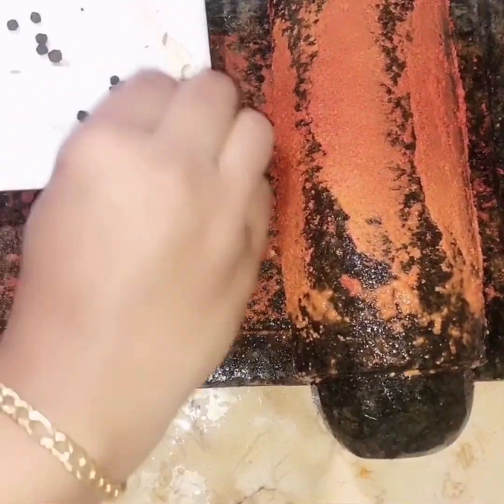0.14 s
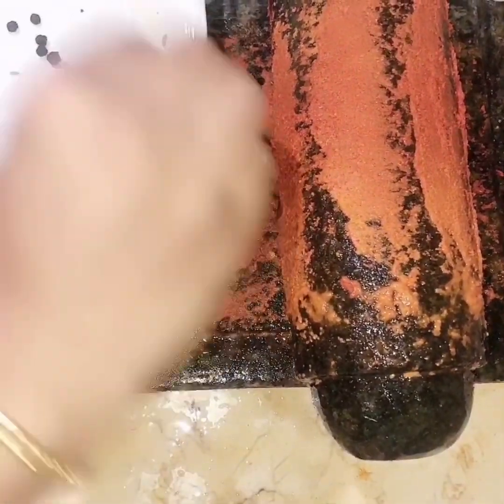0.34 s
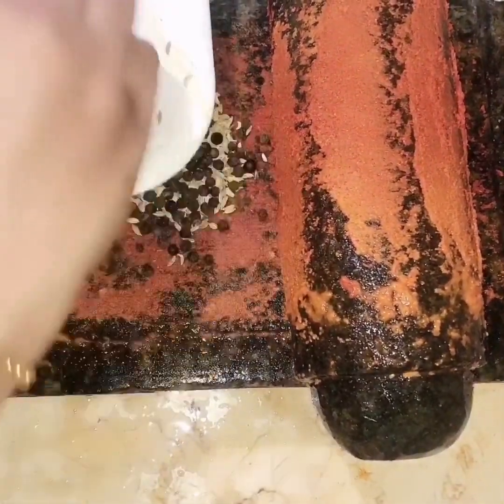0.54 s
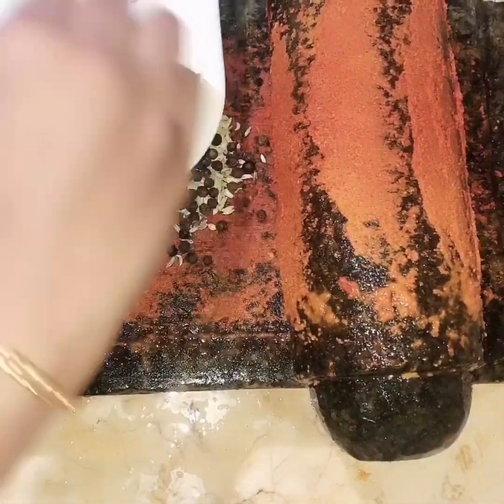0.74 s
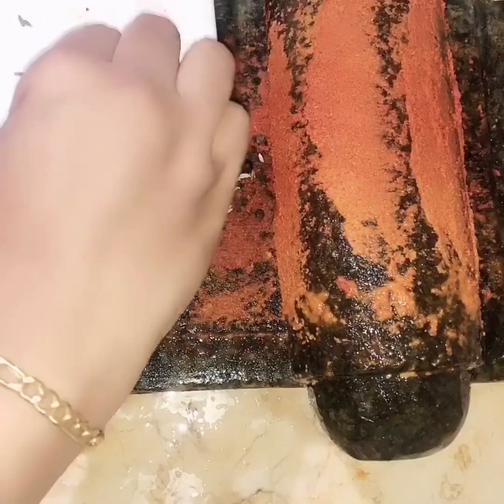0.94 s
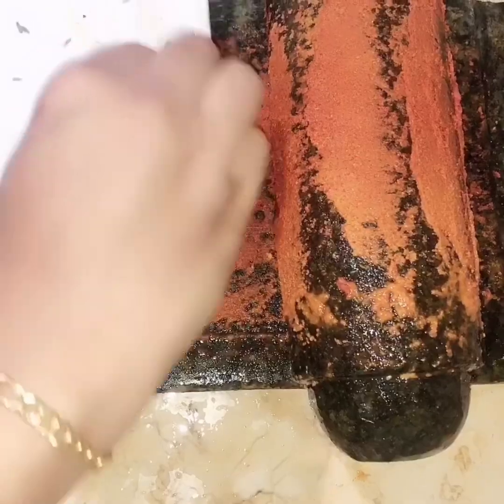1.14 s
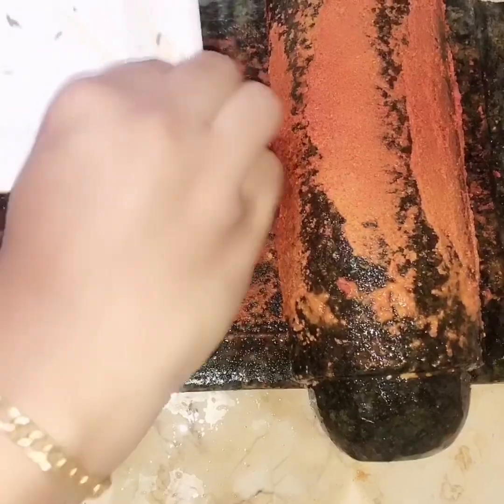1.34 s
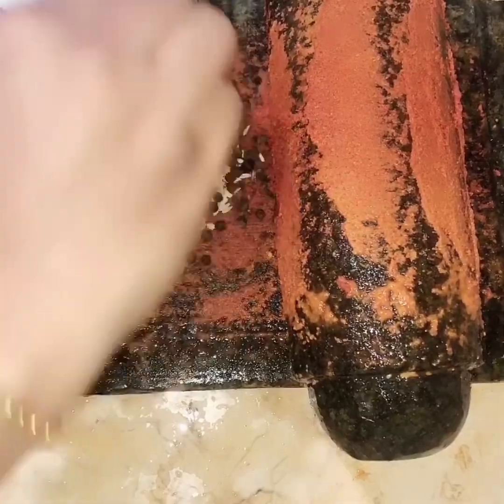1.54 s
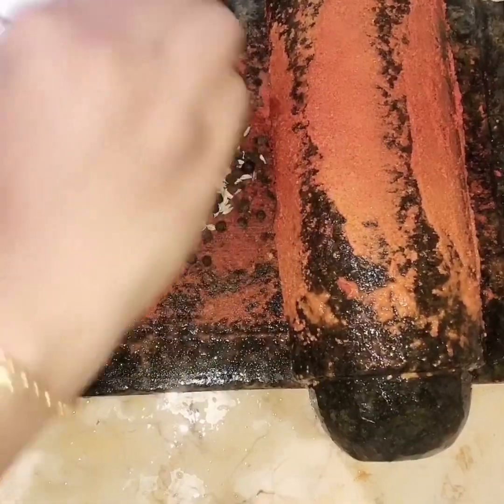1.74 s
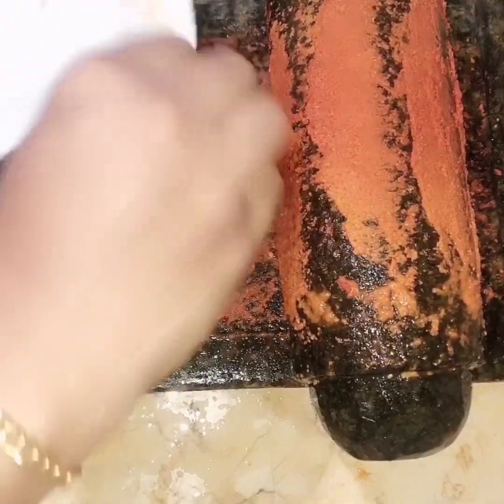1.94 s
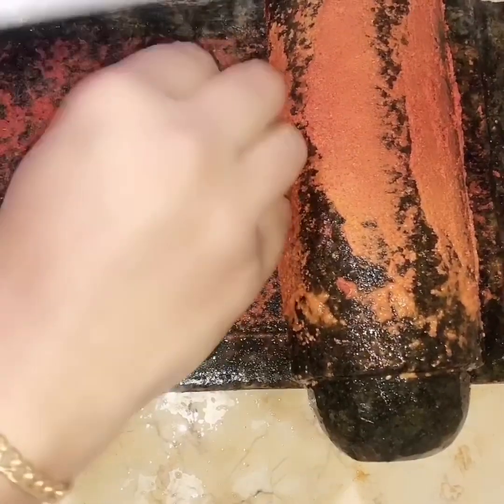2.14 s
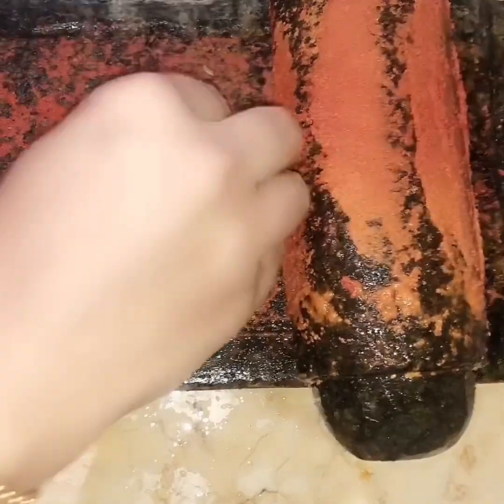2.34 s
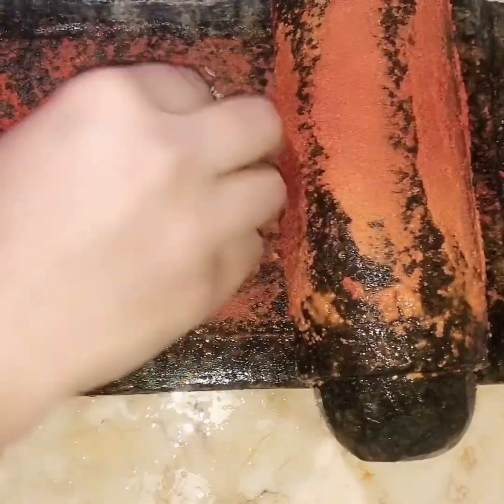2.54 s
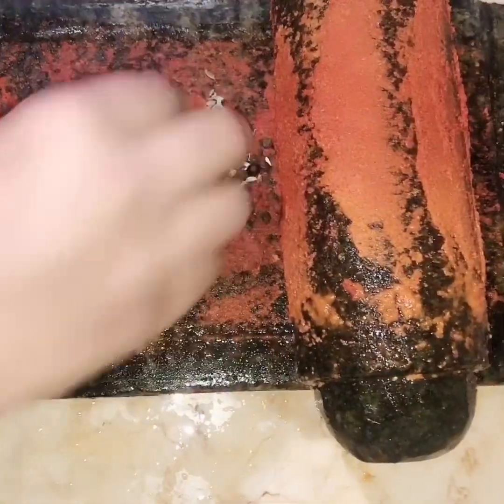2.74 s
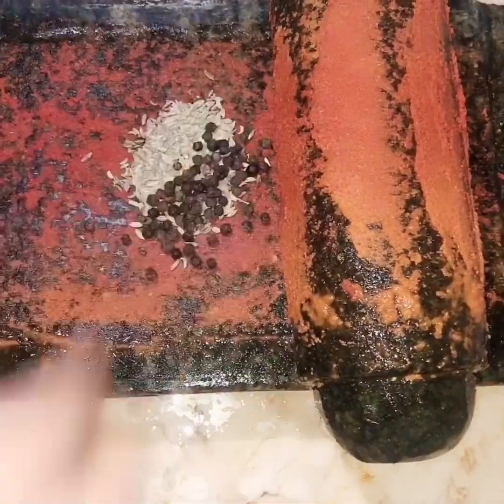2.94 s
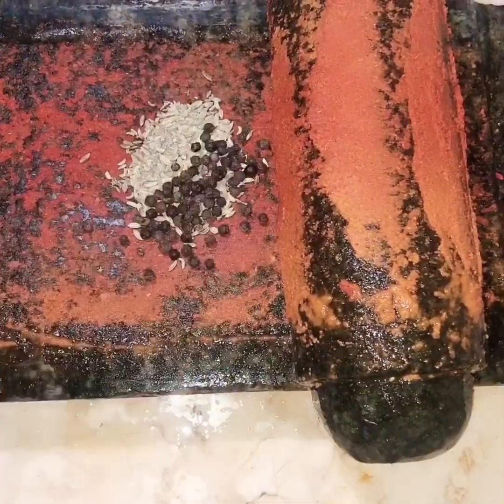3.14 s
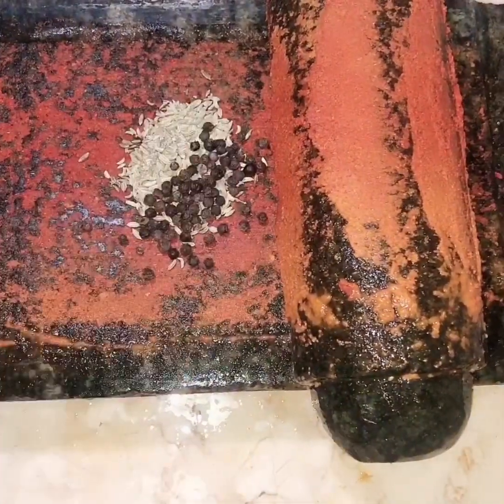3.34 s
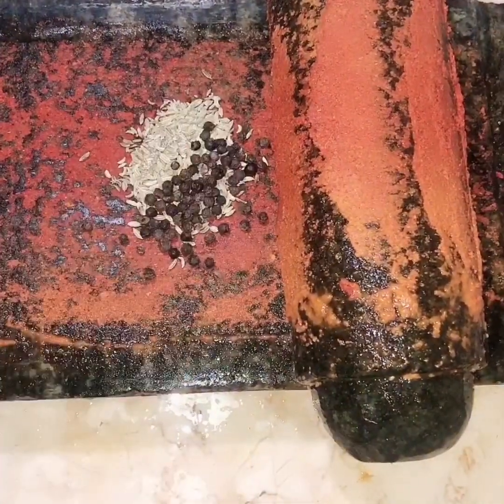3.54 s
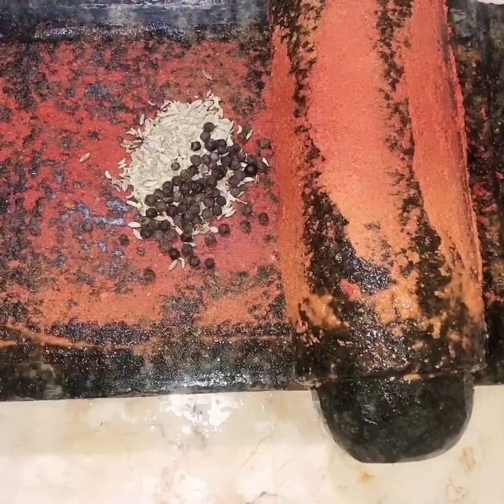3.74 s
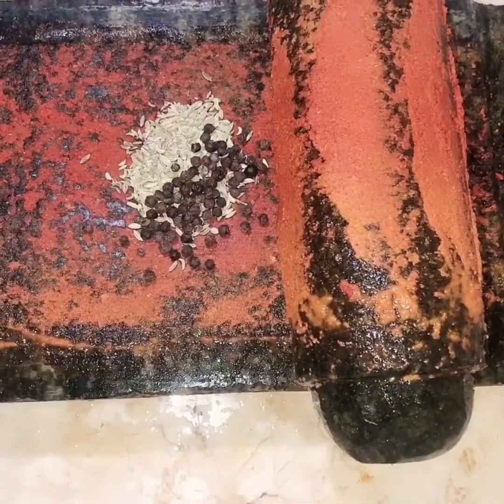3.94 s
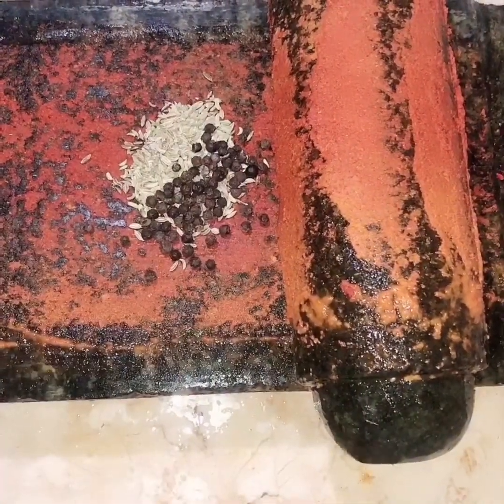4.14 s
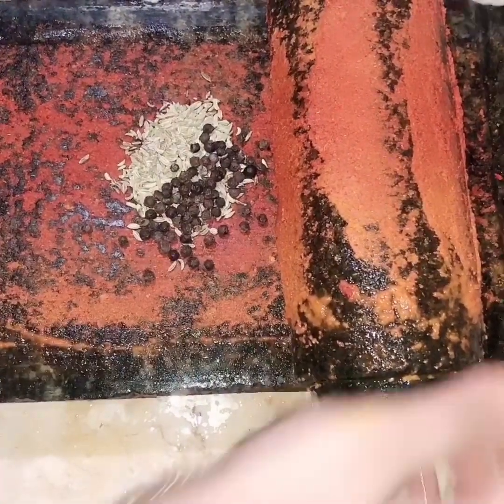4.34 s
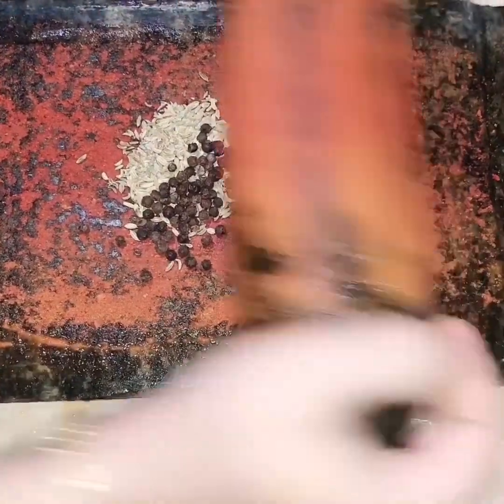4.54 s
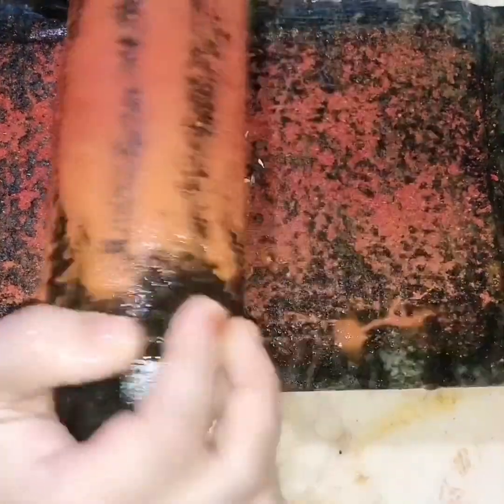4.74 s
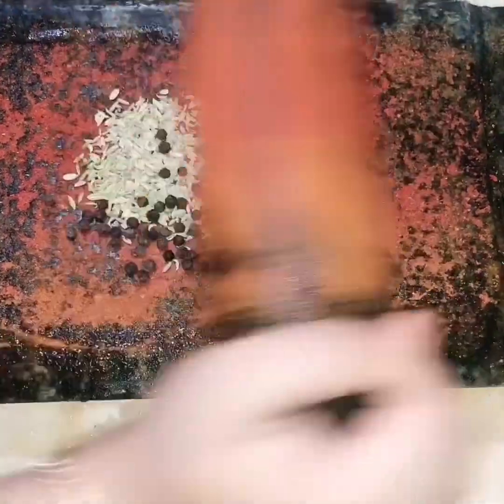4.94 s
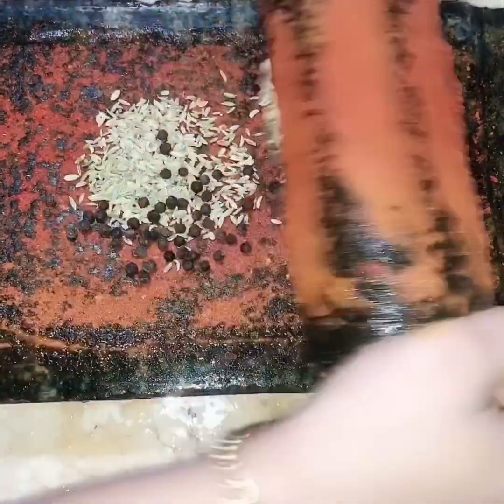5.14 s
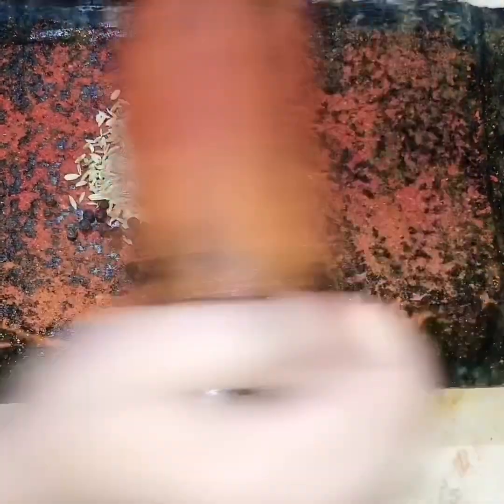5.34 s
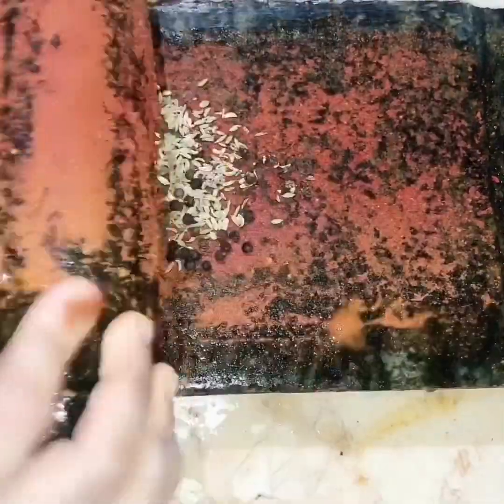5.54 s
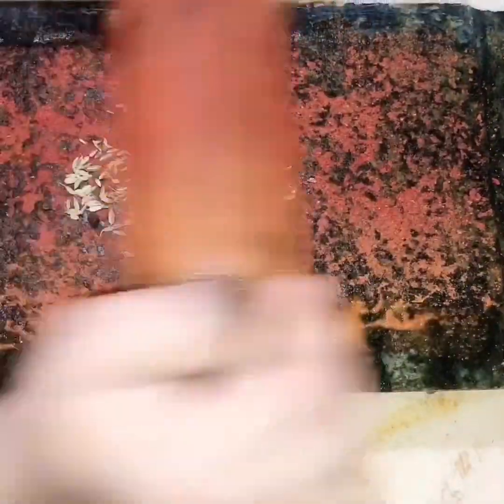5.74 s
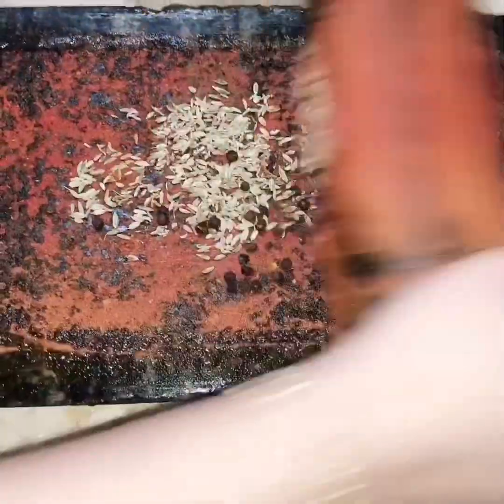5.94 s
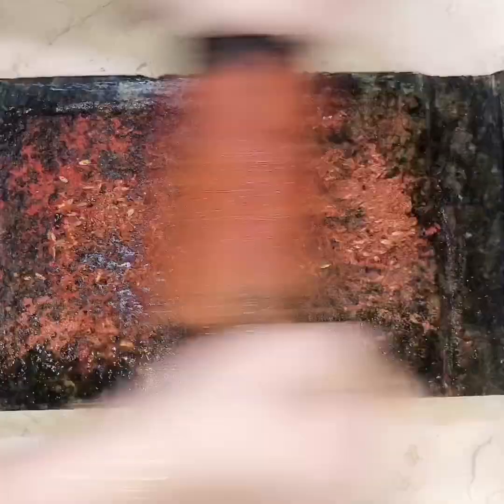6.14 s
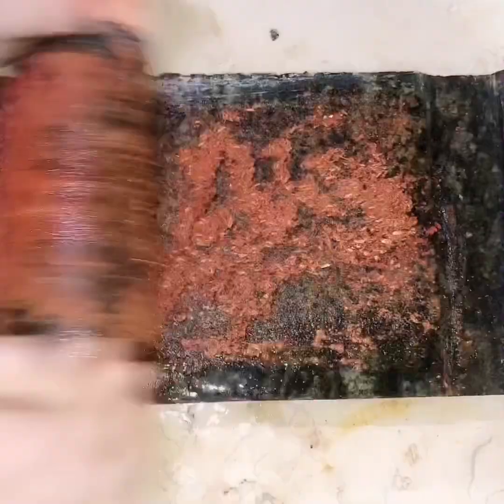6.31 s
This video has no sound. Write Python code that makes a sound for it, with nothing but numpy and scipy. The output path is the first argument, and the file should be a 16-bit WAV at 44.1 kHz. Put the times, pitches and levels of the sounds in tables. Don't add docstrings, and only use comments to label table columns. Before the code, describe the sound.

Close up in an echoing kitchen with a steady low fan drone, dry seeds are brushed off a plate with light rustles, sharp ticks and faint high rings. A pot and its lid clack further away. Then a heavy stone roller knocks, rumbles and scrapes across a slab, cracking seeds, with deep jolts through the counter. Near the end the sound drops out briefly and resumes with more grinding.

```python
import sys
import numpy as np
from scipy import signal
from scipy.fft import rfft, irfft
from scipy.io import wavfile
from scipy.ndimage import uniform_filter1d, minimum_filter1d

SR = 44100
rng = np.random.default_rng(int(sys.argv[2]) if len(sys.argv) > 2 else 0)


def to_linear_factor(level_db):
    exponent = np.asarray(level_db, float) / 20
    return 10 ** exponent


def waveform_to_disk(signal):
    frames = np.transpose(np.atleast_2d(signal))
    scaled = np.clip(frames, -1, 1) * 32767
    samples = np.round(scaled).astype(np.int16)
    wavfile.write(sys.argv[1], SR, samples)


N = 285629

# pitch_hz, level_db
FAN_AIR = [(15, -43), (27, -9), (120, 0), (190, -6), (225, -12.5), (1500, -27), (5880, -49), (11800, -54.5)]
# pitch_hz, width_hz, level_db
FAN_CASE = [(378, 28, -24.5), (681, 44, -19.5), (1060, 170, -25), (1925, 200, -28.5), (2690, 110, -31.5),
            (3244, 180, -37.5)]
# pitch_hz, decay_s
ECHO_DECAY = [(200, 0.52), (1000, 0.46), (3000, 0.45), (8000, 0.33), (14000, 0.045)]
# start_s, end_s, fade_in_s
CUTS = [
    (5.937, 5.939, .006),
    (5.984, 6.121, .004),
    (6.476, 6.5, .004),
]

# start_s, level_db, pitch_hz, ring_s
CHINKS = [
    (3.6, -55, 9400, 0.11),
    (3.93, -59, 12600, 0.18),
    (3.95, -57.5, 12100, 0.2),
    (4.17, -62, 9500, 0.05),
    (4.16, -57, 12800, 0.058),
    (4.54, -45, 8980, 0.12),
    (5.885, -48, 6400, 0.037),
    (6.41, -54, 6350, .15),
]
# start_s, level_db, pitch_hz, ring_s
SIDE_TICK = [
    (3.889, -29, 2950, 0.0081),
]

# start_s, level_db, brightness_db_per_octave, echo_db, contact_ms
POT_BLOWS = [
    (3.093, -5.5, -3.05, -2, 6.5),
    (3.263, -3.5, 0.12, 4, 2.7),
    (3.282, -5, -1, 1.5, 3.5),
    (3.345, -13, 1, 3, 8),
]
# start_s, level_db, brightness_db_per_octave, contact_ms
LID_BLOWS = [
    (3.543, -11.5, 3, 7.1),
    (3.566, -17, 3, 6),
    (3.591, -18, -1.5, 15),
    (3.62, -28, 4, 4.4),
    (3.677, -20, -3.5, 8.9),
    (3.693, -28, -16, 6),
    (3.744, -25.5, -1, 6),
    (3.795, -31, -9, 13),
    (3.94, -29, -3.5, 7.3),
]
# pitch_hz, width_hz, level_db
POT_MODES = [(320, 45, -7.5), (720, 26, -8.5), (850, 69, -3.5), (899, 16, 4.5), (1136, 43, -4),
             (1304, 30, -6.5), (1446, 45, 1.5), (1570, 39, -4), (1735, 59, -2), (1928, 16, 5),
             (2600, 42, -1.5), (2884, 110, -4), (3280, 37, -9), (4300, 300, -11)]
LID_MODES = [(307, 120, -1.5), (843, 100, 1), (1301, 110, 5.5), (1370, 110, 7.5), (1547, 31, -0.5),
             (1766, 60, -10), (2052, 42, 4), (2460, 81, -5.5), (2654, 70, -6.5), (3064, 210, -4),
             (3990, 92, -15)]
# pitch_hz, level_db
POT_CRACK = [(120, -41), (250, -3), (550, -15), (900, -2.5), (2100, -3), (2500, -8.5), (11000, -27),
             (14000, -42.5)]
LID_CRACK = [(290, -40), (500, -5.5), (1050, -14.5), (1680, 2.5), (2070, -10.5), (2320, -14), (8480, -22),
             (14000, -40)]

# start_s, level_db
PLATE_TAPS = [
    (0.724, -48),
    (0.905, -42),
    (0.9521, -33),
    (0.9839, -29.5),
    (1.0216, -29),
    (1.0494, -45.5),
]
# start_s, level_db, echo_db, contact_ms
PLATE_SLIDE = [
    (1.476, -42, -13.5, 6.5),
    (2.069, -35, 8, 14),
    (2.089, -35.5, 12, 9),
    (2.111, -34.5, 0, 9.1),
    (2.134, -37, 3.5, 7.1),
    (2.28, -46, 9, 14),
    (2.4, -54, 17, 12),
]
# pitch_hz, width_hz, level_db
PLATE_MODES = [(1880, 67, 4), (2087, 44, 6.5), (2560, 48, -0.5), (3300, 130, -3.5), (4700, 500, -11),
               (7000, 900, -9)]
RIM_MODES = [(1890, 60, 1.5), (2840, 180, 10), (3100, 120, 8.5), (3870, 300, 3), (5000, 660, 5.5),
             (5500, 300, -15), (7500, 540, -5)]
# pitch_hz, level_db
PLATE_CRACK = [(1200, -27), (2000, 5), (3000, -25), (5000, 1), (10000, -7), (13000, -24)]

# start_s, level_db, rise_s, fall_s (both per 20 dB)
BRUSHES = [(0.02, -51, 0.19, 0.16), (0.15, -52.5, 0.1, 0.2), (0.6, -53.5, 0.23, -1),
           (0.74, -48.5, 0.21, 0.13), (0.93, -48.5, 0.13, 0.3), (1.04, -48, 0.34, 0.06),
           (1.488, -39.5, .005, 0), (1.64, -60, 0.23, -0.2), (1.932, -54, 0.012, -2.2),
           (2.07, -65, .012, -2.4), (2.59, -60, 0.99, 0.1), (2.85, -64.5, 0.65, 0.3)]
# start_s, level_db, rise_s, fall_s (both per 20 dB)
CRUSHES = [(3.95, -63, .01, 0.6), (4.3, -61, 0.074, 0.5), (4.53, -57, 0.17, 0.5), (4.73, -41, 0.055, -0.07),
           (4.87, -38.5, 0.18, -0.13), (5.22, -51, .42, -0.1), (5.28, -57.5, .013, 0),
           (5.35, -48.5, 0.018, 0.3), (5.55, -39.5, 0.15, 0.11), (5.62, -36, .01, -0.01),
           (5.651, -42, .03, 0.2), (5.98, -40.5, 0.15, -0.05), (6.124, -49, .01, -1),
           (6.27, -35.5, 0.13, 0.16)]
# start_s, level_db, pitch_hz
BOUNCES = [(0.0144, -34, 8400), (0.0997, -49, 7000), (0.1391, -39.5, 9000), (0.1625, -33, 7300),
           (0.2487, -38, 9200), (0.4933, -41, 9200), (0.5222, -45, 7000), (0.5462, -38, 6030),
           (0.5596, -38, 5100), (0.5781, -39, 7500), (0.624, -40, 8000), (0.7272, -28, 5400),
           (0.8719, -54, 5600), (0.9048, -33.5, 7360), (1.0216, -30, 7140), (1.4786, -28, 5840),
           (1.6294, -45, 4960), (2.449, -38, 5430), (2.4962, -40, 5570), (2.5287, -41, 5500),
           (2.575, -43, 5140)]
# start_s, level_db
SEED_CRACKS = [(4.533, -19.5), (4.6962, -41), (4.721, -32), (4.732, -12.5), (4.7985, -21), (4.858, -9.5),
               (5.049, -27), (5.167, -21.5), (5.2135, -28), (5.283, -17.5), (5.5406, -18.5),
               (5.5566, -11.5), (5.6143, -11.5), (5.661, -25.5), (5.7523, -26), (5.8636, -23),
               (5.9488, -24)]
# pitch_hz, level_db
BRUSHED_COLOUR = [(2060, -9.5), (3500, -5.5), (3920, -9.5), (7040, -8), (10300, -14), (12700, -26.5),
                  (14800, -30), (16000, -46)]
CRUSHED_COLOUR = [(1500, -20.5), (2500, 0.5), (4150, -7.5), (5350, -4.5), (8630, -2), (11000, -6),
                  (13400, -15), (16000, -24)]

# start_s, rumble_db, thud_db, fall_s (per 20 dB)
PUSHES = [(4.326, -31.5, -55, 0.5), (4.422, -37, -47, -4), (4.531, -28, -38, .16),
          (4.738, -23, -29.5, 0.32), (4.848, -16, -40, -0.44), (4.912, -22, -25, 0.16),
          (5.066, -40, -25, 0), (5.103, -17, -38, 0.14), (5.23, -39, -16, 0.02), (5.379, -13, -35, 0.11),
          (5.558, -19.5, -26, 0.38), (5.843, -16.5, -32, 0.03), (5.98, -22.5, -27, 0.1),
          (6.138, -34.5, -24.5, 0), (6.246, -19, -39, 0.3), (6.432, -23.5, -54, .08)]
# start_s, scrape_db, hold_s
DRAGS = [(4.347, -32, .21), (4.56, -40, .005), (4.706, -22.5, 0.0055), (4.752, -29, .006),
         (4.871, -25, 0.014), (5.166, -22.5, .004), (5.208, -38.5, 0.026), (5.453, -30.5, 0.042),
         (5.52, -26, 0.0033), (5.58, -35, .12), (5.749, -50, .06), (5.873, -43, 0.12), (6.217, -32.5, .1),
         (6.35, -20.5, .003), (6.386, -21, 0.019)]
# start_s, level_db, pitch_hz, ring_s
JOLTS = [(3.277, -24, 154, 0.21), (3.598, -25.5, 156.2, 0.31), (3.678, -25, 81, 0.13),
         (4.828, -16.5, 174, 0.044), (4.894, -8, 172, 0.035), (5.07, -18, 73, 0.092),
         (5.116, -12, 87.5, 0.062), (5.322, -16.5, 99, 0.22), (5.368, -8, 111, 0.11),
         (5.539, -15, 138, 0.21), (5.557, -6, 101.7, 0.2), (5.617, -17, 115, 0.077),
         (5.71, -9.5, 115.6, 0.095), (5.959, -22, 98.8, 0.16), (6.234, -19, 120.6, 0.068),
         (6.418, -8, 310, 0.017)]
# pitch_hz, width_hz, level_db
SCRAPE_MODES = [(310, 38, 8.5), (459, 30, -8), (708, 57, 2), (940, 250, -14.5), (1204, 90, -1),
                (1500, 100, -9.5), (1950, 350, -15)]
SLAB_MODES = [(119, 64.3, 3.5), (166, 67, 2), (249, 55, -6), (310, 38, -5.5), (373, 49, -17.5)]

# start_s, level_db, brightness_db_per_octave, echo_db, contact_ms
KNOCKS = [(4.315, -18, -31.5, 0, 5.4), (4.337, -17.5, -25, -13, 2.2), (4.394, -26, -27, 7, 2.4),
          (4.427, -24, -42, -6, 5), (4.457, -22, -44, -9, 7.2), (4.523, -29.5, -36, -8, 3.3),
          (4.558, -26, -33, -9, 4.6), (4.689, -33, -32, 0, 2.7), (4.703, -22, -36, 10, 5.3),
          (4.71, -21, -22, 2.5, 5.9), (4.743, -13, -24, -3, 4.7), (4.81, 0, 2, -1.5, 5.8),
          (5.088, -2, -11, -5.5, 3.1), (5.154, -6, -12.5, -7.5, 16), (5.351, 5, 9.5, 0.5, 4.7),
          (5.519, -16.5, -8, 3, 2), (5.697, 0.5, -2, -1.5, 4.3), (5.828, -2.5, -7, -4.5, 6),
          (6.342, -6.5, -4.5, 4, 2.6), (6.383, -9, -35, 1, 4.5), (6.414, -8.5, -9, 2, 2.7)]
# pitch_hz, width_hz, level_db
STONE_MODES = [(310, 89, -7), (410, 50, -6.5), (692, 32, -3.5), (960, 150, -17), (1175, 132, 4),
               (1450, 90, -17), (1698, 150, -10), (1980, 170, -9.5), (2300, 270, -18), (2630, 90, -21.5),
               (2950, 200, -20)]
# pitch_hz, level_db
STONE_CRACK = [(210, -41), (350, -9), (570, -9), (1210, -4.5), (1940, -12.5), (2290, -24.5), (3100, -26),
               (4200, -47)]


def level(x, db):
    return x * to_linear_factor(db) / np.sqrt(np.mean(x ** 2))


def shape(x, points):
    hz, db = np.transpose(points)
    f = np.arange(len(x) // 2 + 1) * SR / len(x) + 1
    gain = to_linear_factor(np.interp(np.log(f), np.log(hz), db))
    return irfft(rfft(x) * gain, len(x))


def dull(x, hz, order=4):
    return signal.sosfilt(signal.butter(order, hz, fs=SR, output="sos"), x)


def resonate(x, modes):
    out = 0
    for k, (hz, width_hz, db) in enumerate(modes):
        ring = signal.lfilter(*signal.iirpeak(hz, hz / width_hz, fs=SR), x)
        out = out + (-1) ** k * to_linear_factor(db) * ring
    return out


def walk(rate):
    k = int(SR / rate)
    steps = np.repeat(rng.standard_normal(N // k + 1), k)
    return 2.22 * uniform_filter1d(uniform_filter1d(steps, k), k)[:N]


def grains(rate, spread_db):
    when, size, sign = rng.random((3, N))
    loudness = to_linear_factor(-spread_db * np.log(size + 1e-6))
    return (when < rate / SR) * loudness * np.sign(sign - 0.5)


def add(out, start_s, sound):
    i = int(start_s * SR)
    out[i:i + len(sound)] += sound[:N - i]


def swells(start_s, db, rise_s, fall_s, hold_s=0):
    columns = (start_s, db, rise_s, fall_s, hold_s)
    start_s, db, rise_s, fall_s, hold_s = (np.reshape(v, (-1, 1)) for v in columns)
    late = np.arange(N) / SR - start_s
    rising = -late / np.maximum(rise_s, 1e-3)
    falling = (late - hold_s) / np.maximum(fall_s, 1e-3)
    lost = np.maximum(np.maximum(rising, falling), 0)
    return to_linear_factor(np.max(db - 20 * lost, axis=0))


def pings(table, attack_s, tick, rough):
    out, t = np.zeros(N), np.arange(9000) / SR
    for start_s, db, hz, ring_s in table:
        noise = rng.standard_normal(len(t))
        body = np.sin(2 * np.pi * hz * t) + rough * noise
        fade = (1 - np.exp(-t / attack_s)) * 1000 ** (-t / max(ring_s, 0.004))
        ring = body * fade + tick * noise * np.exp(-t / 0.000053)
        add(out, start_s, ring * to_linear_factor(db) / np.abs(ring).max())
    return out


def blows(table, modes, crack, crack_db, scatter_db, sent_ring_db=-5.5):
    first_touch = 8.8
    detune = 0.02
    out, t = np.zeros((2, N)), np.arange(6000) / SR
    for start_s, db, tilt_db, echo_db, contact_ms in table:
        push = np.minimum(t / 0.00069, 1) * np.exp(-(t * 1000 / max(contact_ms, 0.3)) ** 4)
        force = np.array([rng.standard_normal(len(t)) * push, t == t[88]])
        spot_db = scatter_db * rng.standard_normal(len(modes))

        def bright(hz):
            return tilt_db * max(np.log2(hz / 1000), 0)

        colour = [(hz, g + bright(hz)) for hz, g in crack]
        ring = np.array([level(shape(f, colour) * (t > 0), crack_db) for f in force])
        force[0, 40] += first_touch
        for (hz, width_hz, mode_db), extra_db in zip(modes, spot_db):
            hz *= 1 + detune * np.tanh(rng.standard_normal())
            narrow = resonate(force, [(hz, width_hz, 0)])
            narrow = resonate(narrow, [(hz, hz / 3.14, 0)])
            gain_db = mode_db + extra_db + bright(hz)
            mode = np.array([level(row, gain_db) for row in narrow])
            ring += np.sign(extra_db) * mode * to_linear_factor(np.array([[0], [sent_ring_db]]))
        ring *= np.minimum(t / 0.00028, 1) * (t < t[5000])
        ring *= to_linear_factor(db) / np.abs(ring[0]).max()
        add(out[0], start_s, ring[0])
        add(out[1], start_s, ring[1] * to_linear_factor(echo_db))
    return out


def fan():
    air = dull(shape(rng.standard_normal(N), FAN_AIR), 13500, order=8)
    case = resonate(rng.standard_normal(N), FAN_CASE)
    waver = to_linear_factor(0.3 * walk(6))
    return level((level(air, 0) + to_linear_factor(27.0) * case) * waver, -39.5)


def kitchen(x, gap_s):
    t, echo = np.arange(3 * SR // 4) / SR, 0
    hz, decay_s = np.transpose(ECHO_DECAY)
    for f in 150 * 2 ** np.arange(0, 6.6, 0.5):
        band = resonate(rng.standard_normal(len(t)), [(f, f / 2.2, 0)])
        echo = echo + band * 1000 ** (-t / np.interp(np.log(f), np.log(hz), decay_s))
    echo *= np.clip(t / gap_s, 0, 1) ** 4
    echo *= to_linear_factor(-2.5) / np.sqrt(np.sum(echo ** 2))
    echo[int(0.016 * SR)] += to_linear_factor(-12)
    return signal.fftconvolve(x, echo)[:N]


def side_tick():
    return pings(SIDE_TICK, 0.0012, tick=0.02, rough=0.13)


def bracelet():
    flutter = to_linear_factor(6.2 * walk(160) - 1.0)
    return pings(CHINKS, 0.0067, tick=0.01, rough=0.098) * flutter


def pot_and_lid():
    lid_echo_db = 3
    lid = [(s, db, tilt, lid_echo_db, ms) for s, db, tilt, ms in LID_BLOWS]
    return blows(POT_BLOWS, POT_MODES, POT_CRACK, 7.2, 1.0) + blows(lid, LID_MODES, LID_CRACK, 3.2, 2.2)


def plate():
    tap_tilt_db, tap_echo_db, tap_ms, slide_tilt_db = -2, 0, 7.9, -1.5
    taps = [(s, db, tap_tilt_db, tap_echo_db, tap_ms) for s, db in PLATE_TAPS]
    slide = [(s, db, slide_tilt_db, echo, ms) for s, db, echo, ms in PLATE_SLIDE]
    tapped = blows(taps, PLATE_MODES, PLATE_CRACK, -1.0, 1.0)
    return tapped + blows(slide, RIM_MODES, PLATE_CRACK, -6.0, 0.35)


def seeds():
    rustle = level(grains(4000, 2.0), 0) + 0.57 * rng.standard_normal(N)
    brushed = level(shape(rustle, BRUSHED_COLOUR), 0.2) * swells(*np.transpose(BRUSHES))
    crushed = level(shape(rustle, CRUSHED_COLOUR), 0.2) * swells(*np.transpose(CRUSHES))
    patchy = to_linear_factor(2.1 * walk(60))
    bounce_ring_s, crack_ring_s, crack_hz, crack_spread = 0.03, 0.028, 9500, 0.12
    single = [(*row, bounce_ring_s) for row in BOUNCES]
    for row in SEED_CRACKS:
        single.append((*row, crack_hz * (1 + crack_spread * rng.standard_normal()), crack_ring_s))
    snaps = pings(single, 0.00033, tick=1.7, rough=1.8)
    small_body = signal.butter(3, [4600, 13000], "band", fs=SR, output="sos")
    return (brushed + crushed) * patchy + signal.sosfilt(small_body, snaps) * to_linear_factor(-4.0)


def roller_on_slab():
    push_rise_s, thud_linger, drag_rise_s, drag_fall_s = 0.049, 3.3, 0.027, 0.049
    start_s, rumble_db, thud_db, fall_s = np.transpose(PUSHES)
    rumble = swells(start_s, rumble_db, push_rise_s, fall_s)
    thud = swells(start_s, thud_db, push_rise_s, fall_s * thud_linger)
    start_s, scrape_db, hold_s = np.transpose(DRAGS)
    scrape = uniform_filter1d(swells(start_s, scrape_db, drag_rise_s, drag_fall_s, hold_s), size=400)
    grind = level(dull(resonate(grains(900, 1.5), SCRAPE_MODES), 2020), -2.1)
    grind = grind * to_linear_factor(1.4 * walk(55))
    shake = level(resonate(resonate(grains(600, 1.8), SLAB_MODES), [(174, 850, 0)]), -0.51)
    deep = level(resonate(resonate(grains(90, 1.1), [(63.3, 50, 0)]), [(57.6, 61, 0)]), -0.25)
    jolts = pings(JOLTS, 0.00051, tick=0.006, rough=0.011)
    return scrape * grind + rumble * shake + thud * deep + jolts


def roller_knocks():
    knocks = blows(KNOCKS, STONE_MODES, STONE_CRACK, -0.5, 2.6, sent_ring_db=-17)
    knocks = dull(knocks, 3380, order=6)
    no_bass = signal.butter(2, 520, "high", fs=SR, output="sos")
    knocks[0] = signal.sosfilt(no_bass, knocks[0])
    return knocks


def scene():
    direct, sent = roller_knocks() + plate()
    far, far_sent = pot_and_lid()
    near = seeds() + bracelet() + side_tick()
    echoes = kitchen(sent + to_linear_factor(-9.5) * near, gap_s=0.0087) + kitchen(far_sent, gap_s=0.00095)
    t = np.arange(N) / SR
    echoes *= (t < CUTS[0][0]) | (t > CUTS[1][1])
    return (direct + far + near + roller_on_slab() + echoes + fan())[None]


def thin_top(x):
    top_hz, band_bins, hold_frames = 13250, 9, 3
    f, _, z = signal.stft(x, SR, nperseg=1024)
    hz = f[:, None]
    band = np.arange(len(f)) // band_bins
    power = np.add.reduceat(np.abs(z) ** 2, np.arange(0, len(f), band_bins), axis=0) / band_bins
    chance = np.repeat(rng.standard_normal(power.shape), hold_frames, axis=1)[:, :power.shape[1]]
    strength_db = (10 * np.log10(power + 1e-20) + 7 * chance)[band]
    need_db = -85.5 + 0.6 * (hz - top_hz) / 1000
    keep = (strength_db > need_db) | (hz < top_hz)
    return signal.istft(z * keep * (hz < 15950), SR, nperseg=1024)[1][:N]


def roll_off(x):
    return signal.sosfilt(signal.butter(12, 16670, fs=SR, output="sos"), x)


def record(dry):
    t, gate = np.arange(N) / SR, 1
    for start_s, end_s, fade_in_s in CUTS:
        open_share = np.maximum((start_s - t) / 0.0005, (t - end_s) / fade_in_s)
        gate = gate * np.clip(open_share, 0, 1)
    heard = thin_top(dry[0])[None]
    room_left = np.minimum(0.93 / (np.abs(heard) + 1e-9), 1)
    ease = uniform_filter1d(minimum_filter1d(room_left, size=257), size=257)
    return roll_off(heard * ease * gate)


dry = scene()
out = record(dry)
waveform_to_disk(out)
```